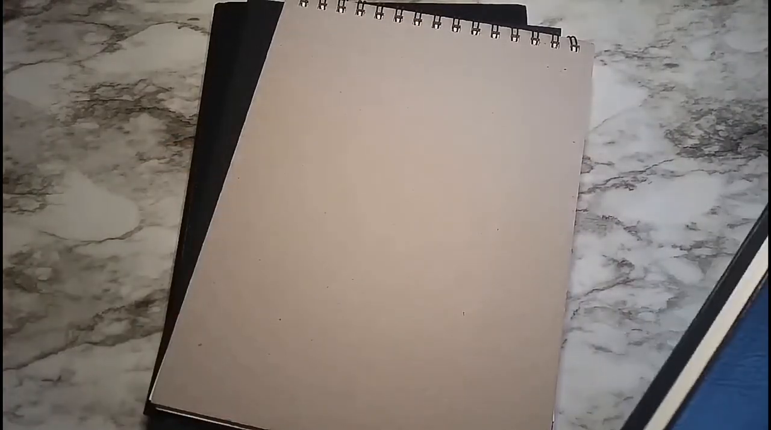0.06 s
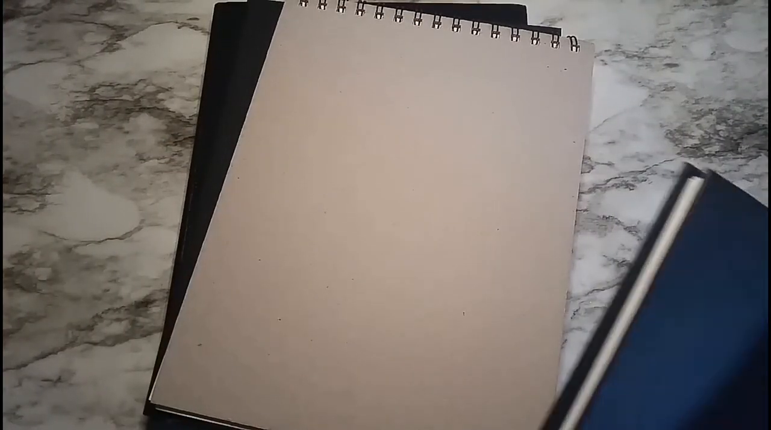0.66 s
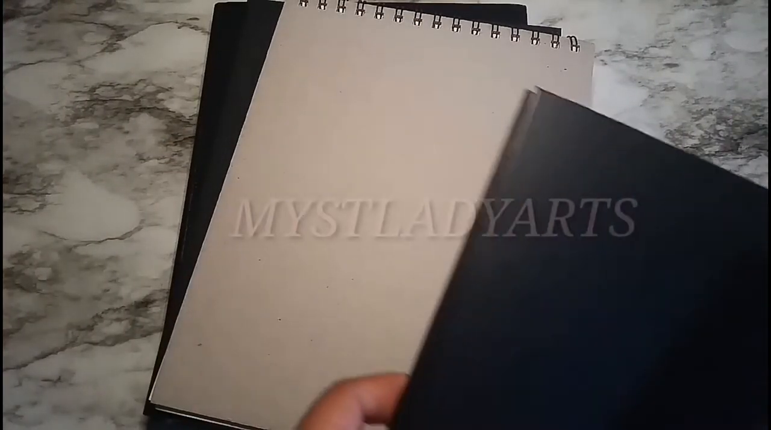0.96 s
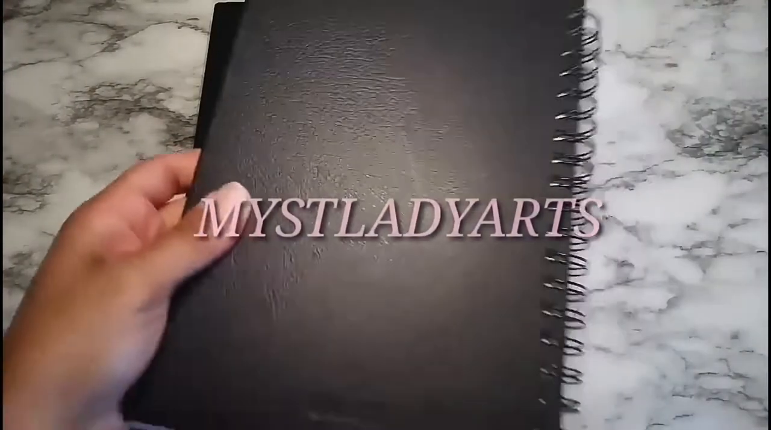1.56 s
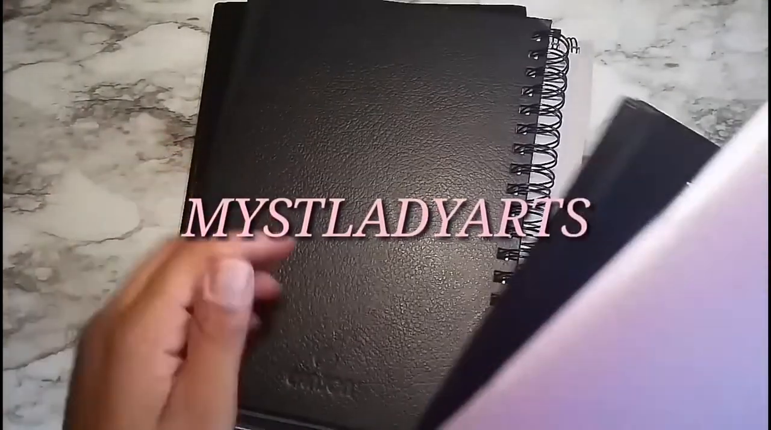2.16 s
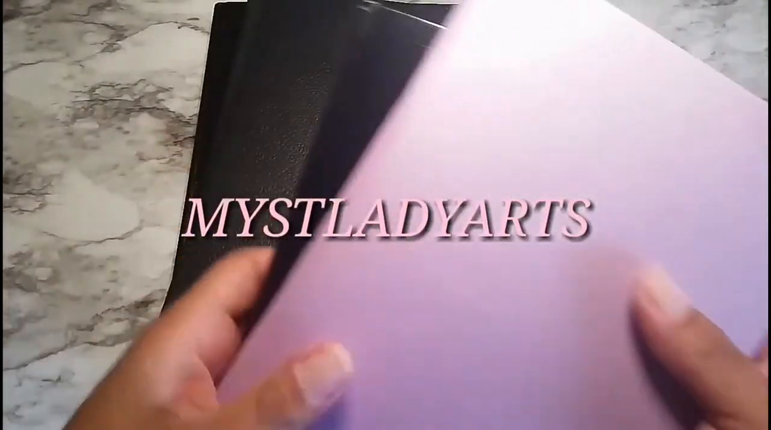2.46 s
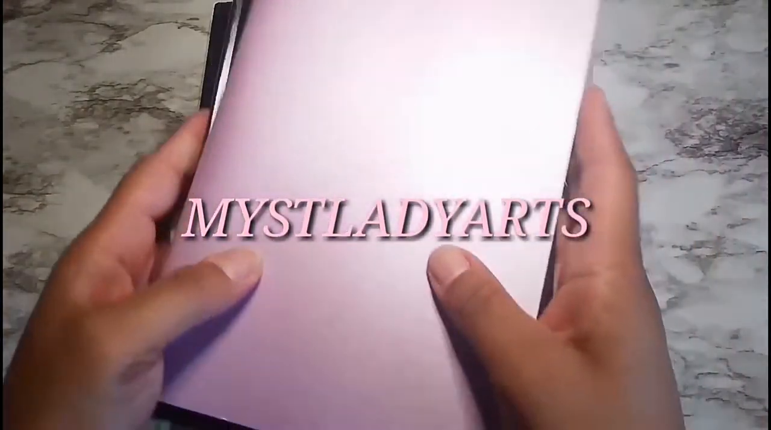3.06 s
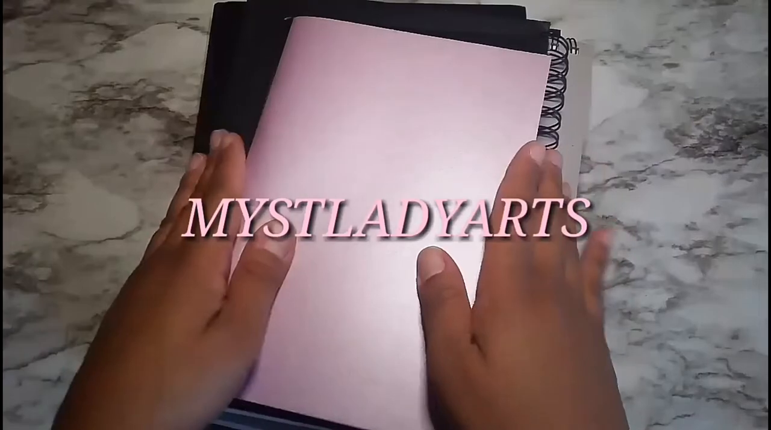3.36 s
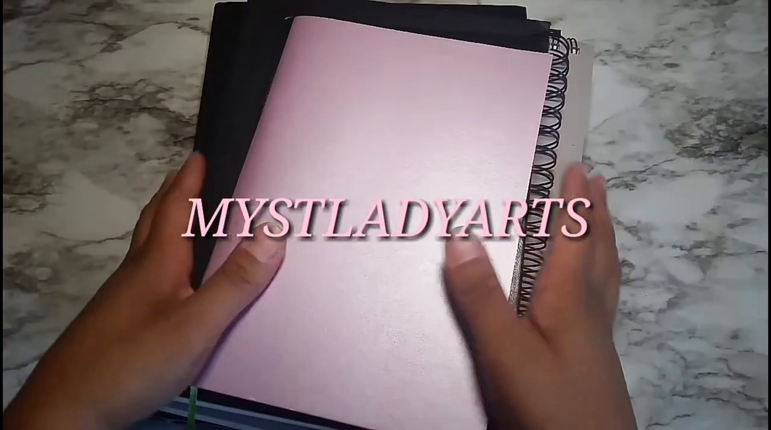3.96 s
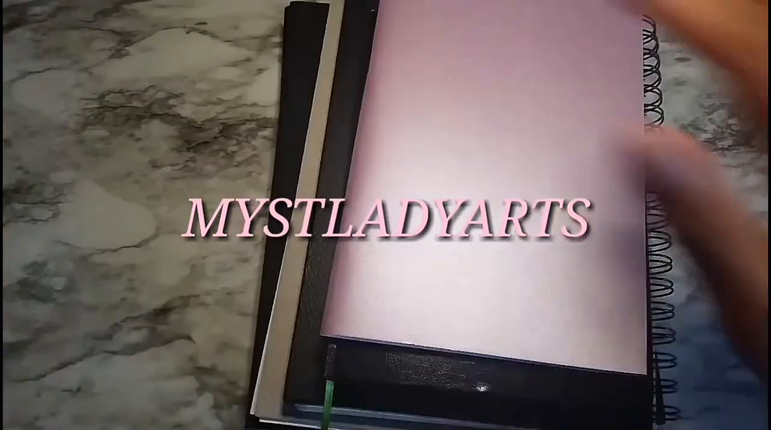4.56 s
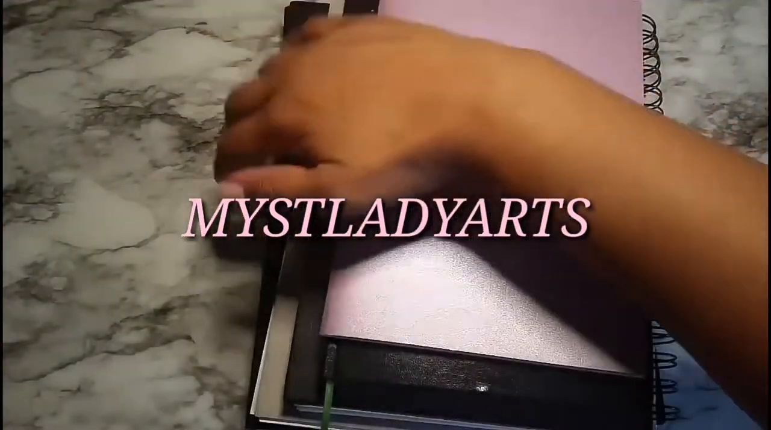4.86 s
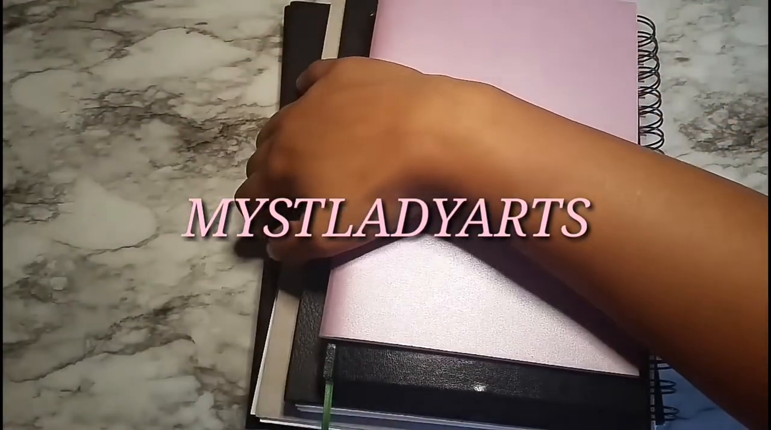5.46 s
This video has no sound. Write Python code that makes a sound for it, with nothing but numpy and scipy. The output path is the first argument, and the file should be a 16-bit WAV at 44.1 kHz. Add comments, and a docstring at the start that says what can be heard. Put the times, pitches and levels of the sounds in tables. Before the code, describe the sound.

Two hardcover sketchbooks are put down one after the other on a stack on a table, each with a sharp slap, a dull thud of pages and a brief wire rattle. Fingers knock and covers slide before each landing. After the heavier second one, everything goes quieter for a moment and an arm sweeps softly over the top. A low hum fills the small room, and the sound is clearer on the left.

```python
"""A small room hums; hands shuffle and tap, then two hardcover sketchbooks slap onto a pile on a table.
Each lands edge first, then flat: the cover slaps, the pages thud, the wire bindings rattle.
Between drops fingers tap and covers slide and scrape; at the end an arm brushes past.
The right microphone is muffled; gain control ducks for about a second after the heaviest drop."""
import sys
import numpy as np
from scipy import signal
from scipy.fft import rfft, irfft, next_fast_len
from scipy.io import wavfile
from scipy.ndimage import uniform_filter1d, minimum_filter1d, map_coordinates

SR = 44100
rng = np.random.default_rng(int(sys.argv[2]) if len(sys.argv) > 2 else 0)


def transcribe(u):
    """Save the signal u as a 16-bit wav file named by the first command-line argument.

    u: samples, shape (n,) or (channels, n), limited to [-1, 1]; the rate is SR.
    q: integer samples, one column per channel.
    """
    v = np.clip(np.atleast_2d(u).T, -1, 1)
    q = np.round(v * 32767).astype(np.int16)
    wavfile.write(sys.argv[1], SR, q)


N = 247823

# Table levels are relative; layers add their own offsets.
# left-right likeness of noise: freq_hz, correlation
STEREO_LIKENESS = [(60, 0.98), (130, 0.52), (290, 0.53), (640, 0.27), (1400, 0.008), (15000, 0.035)]
# muffled right microphone: freq_hz, gain_db
RIGHT_MIC_RESPONSE = [(60, -3.5), (170, -6), (400, -10), (720, -7), (1100, -20.5), (1600, -13), (3000, -14),
                      (5000, -10), (6500, 1), (8000, -3), (15000, -0.5)]
# reverb decay: freq_hz, t60_s
ROOM_DECAY = [(80, 0.41), (300, 0.58), (1000, 0.68), (4000, 0.49), (14000, 0.56)]
# reverb colour: freq_hz, density_db
ROOM_SPECTRUM = [(100, 5), (220, -12.5), (400, -2), (650, -6), (1000, -6), (4000, -1), (7000, -0.5),
                 (12000, 0.5)]
# room air: freq_hz, density_db
AIR_SPECTRUM = [(20, -15.5), (48, -6), (90, -2), (120, -3), (150, -10), (205, 1.5), (270, -7.5),
                (360, -7.5), (520, -16), (800, -18.5), (1500, -27.5), (3200, -40.5), (4200, -34),
                (5050, -28), (5700, -50), (6800, -47.5), (8500, -65), (12000, -46), (16000, -47)]
# background balance: freq_hz, left_minus_right_db
AIR_BALANCE = [(60, 3), (200, 6.5), (600, 9), (1300, 1), (2400, -3), (3300, -2.5), (5000, -11.5),
               (6500, -6), (9000, 2.5), (15000, 0)]
# appliance hum: pitch_hz, level_db
HUM_TONES = [(59.2, -57), (118.4, -52.5), (209.9, -55), (355.3, -58)]

# hands straightening the pile, then the passing arm: start_s, length_s, rumble_db, brush_db
HAND_AND_ARM_SWEEPS = [(3.8, 0.67, -49, -60), (4.36, 0.28, -44.5, -67), (4.655, 0.23, -38.5, -58.5),
                       (4.87, 0.36, -45, -59.5), (5.18, 0.29, -39.5, -50.5), (5.42, 0.44, -43, -52.5)]
# hands on the pile and passing arm: freq_hz, density_db
RUMBLE_SPECTRUM = [(20, -29), (45, 2.5), (80, -2), (180, 2.5), (260, -8), (350, -11.5), (700, -23.5),
                   (1500, -66)]
# skin brushing the cover: freq_hz, density_db
BRUSH_SPECTRUM = [(300, 9), (700, -6), (1500, -3.5), (3000, -14), (5000, -7.5), (7000, -32), (9000, -38),
                  (12000, -21), (16000, -23)]
# skin catching on the cover: start_s, length_s, level_db, centre_hz
SKIN_RUSTLES = [(4.689, 0.03, -62, 2480), (4.715, 0.089, -64, 1300), (5.139, 0.062, -58, 1350),
                (5.501, 0.035, -61.5, 2660), (5.558, 0.036, -58, 1290)]
# arm nudging the pile: start_s, level_db, pitch_hz
PILE_NUDGES = [(4.734, -22.5, 189), (4.755, -21, 90), (4.765, -24, 142), (4.835, -32, 273),
               (5.235, -24.5, 240), (5.365, -28, 237), (5.398, -25, 111), (5.529, -28, 152)]

# hand and cover movements: start_s, length_s, shuffle_db, slide_db
RUB_STROKES = [(0.08, 0.72, -48.5, -71), (0.74, 0.17, -52, -64.5), (0.99, 0.31, -44, -56.5),
               (1.3, 0.2, -54.5, -80), (2.54, 0.25, -70, -59), (2.685, 0.089, -47.5, -55.5),
               (2.765, 0.12, -42.5, -50), (2.87, 0.18, -50, -56), (3.005, 0.11, -45, -56),
               (3.08, 0.21, -46.5, -44.5), (3.26, 0.27, -56, -54), (3.85, 0.32, -60, -58),
               (5.49, 0.16, -56, -65.5)]
# hands on covers: freq_hz, density_db
SHUFFLE_SPECTRUM = [(200, -17), (500, 4.5), (800, 8.5), (1100, -5), (1500, -1.5), (2100, -7), (2900, -15),
                    (6000, -64), (16000, -68)]
# cover on cover: freq_hz, density_db
SLIDE_SPECTRUM = [(300, -17), (900, 5), (1600, 4.5), (2800, 0.5), (4600, 2.5), (5400, -7), (6500, -14.5),
                  (8500, -28), (11000, -16.5), (16000, -15)]
# cover edge on grained board: start_s, length_s, level_db, from_hz, to_hz
EDGE_SCRAPES = [(0.133, 0.35, -65, 2060, 1730), (0.286, 0.19, -72, 4700, 4570),
                (0.994, 0.13, -68, 4660, 4530), (2.688, 0.037, -57, 4130, 3400),
                (2.804, 0.049, -57, 4530, 3760), (3.008, 0.06, -53, 4640, 3550),
                (3.096, 0.18, -51, 4900, 2600)]
# flicks of one wire loop: start_s, level_db
LOOP_FLICKS = [(0.823, -48), (4.8981, -40.5)]
# wire loop ring: pitch_hz, level_db, t60_s
LOOP_MODES = [(2326, -11, 0.03), (2750, -12, 0.03), (3930, -8, 0.025), (4280, -1, 0.02), (4650, -1, 0.028)]
# fingers and corners bumping covers:
# start_s, tick_db, treble_db, click_db, click_hz, knock_db, knock_hz, knock_delay_s
COVER_TAPS = [(0.552, -43, -2, -35, 1640, -36.5, 610, 0.00086),
              (0.5561, -52, -2, -32, 1000, -41, 470, 0.00037), (0.823, -41, 1, -39, 1340, -52, 405, 0.0023),
              (.994, -49, -2, -37, 764, -37, 524, 0.0021), (1.099, -49, -2, -32.5, 870, -36, 402, 0.0023),
              (1.1454, -21.5, -20, -16.5, 806, -12.5, 280, 0.0018),
              (1.1954, -52, -2, -38, 1540, -31, 270, 0.00026),
              (2.564, -36.5, -2, -50, 1500, -63, 400, .002),
              (2.6515, -21.5, 7.5, -20.5, 935, -22.5, 286, 0.0058),
              (2.7056, -44, -2, -39, 1090, -48, 446, 0.002),
              (2.779, -54, -2, -30.5, 1160, -37, 370, 0.0023),
              (3.113, -27, -10, -46, 1700, -36, 370, 0.0013), (3.167, -19, 7, -15, 1120, -30, 840, 0.0029),
              (3.171, -29, 3, -23.5, 1700, -42, 920, 0.0019),
              (3.3345, -20.5, 2, -34, 890, -35.5, 624, 0.00063)]
# hollow ring of a firmly knocked book: start_s, level_db, pitch_hz, t60_s
HOLLOW_RINGS = [(1.15, -16, 383, 0.043), (1.165, -29.5, 298, 0.099), (1.8077, -13.5, 390, 0.061),
                (2.656, -16.5, 343, 0.054), (3.482, -15.5, 615, 0.062)]
# pile and tabletop: pitch_hz, level_db, t60_s
TABLETOP_MODES = [(79, -9, .5), (141, -5, .35), (168, -1, .3), (202, -4, .35), (224, -3, .35),
                  (277, -9, .3), (353, -6, .3), (381, -7, .3), (482, -3, .33), (547, -3, .33),
                  (608, -9.5, .32), (706, -3, .3), (760, 0, .35), (900, 2, .3), (1089, -2.5, .35),
                  (1195, -3, .3), (1320, 0, .35), (1510, -3, .2), (1588, -3, .3), (2110, -2, .25),
                  (2430, -4, .25), (2780, -7, .25)]

# two landings per book, edge then flat: time_s, treble_tilt_db, surround_db, tabletop_db, clack_db
BOOK_LANDINGS = [(1.804, -5, -4, -55.5, -11.5), (1.943, -3, -10.5, -55, -17), (3.436, -10, -19, -57, -20),
                 (3.472, -2.5, -0.5, -55.5, -27)]
# quick contacts within the landings: start_s, slap_db, slap_t60_s, thud_db, thud_hz
LANDING_CONTACTS = [(1.804, -18, 0.04, -31, 510), (1.8076, -9, 0.018, -28, 400),
                    (1.8111, -15.5, 0.014, -37, 376), (1.8159, -17, 0.049, -21.5, 450),
                    (1.942, -24, 0.03, -12.5, 307), (1.9458, -20, 0.041, -18.5, 583),
                    (1.9502, -35, 0.03, -16, 266), (1.9546, -22.5, 0.073, -18, 467),
                    (1.9628, -13, 0.043, -12.5, 410), (1.9675, -21, .04, -21, 857),
                    (1.9714, -20.5, 0.082, -14, 232), (3.435, -18.5, 0.028, -11.5, 280),
                    (3.4411, -19, 0.058, -9, 360), (3.4433, -20, 0.015, -17, 1110),
                    (3.4455, -35, .014, -18, 583), (3.4724, -10.5, 0.049, 0.5, 230),
                    (3.4789, -15, 0.044, -10, 576), (3.486, -22, .03, -17, 380),
                    (3.509, -31.5, 0.041, -14.5, 190), (3.522, -29, 0.033, -18, 180),
                    (3.538, -27, .03, -15, 316)]
# cover slap: freq_hz, density_db
SLAP_SPECTRUM = [(60, -3), (250, -4), (600, 8.5), (1100, 1), (1700, -2), (2600, -2), (3300, -7),
                 (4800, -7.5), (6300, -28.5), (8500, -44), (11000, -37), (16000, -37)]
# stiff cover's clack: pitch_hz, level_db, t60_s
COVER_MODES = [(1528, 4, 0.038), (2250, 0.5, 0.038), (2890, -10, 0.052), (3485, -2.5, 0.034),
               (4680, -15.5, 0.075)]
# jolts to the wire bindings: start_s, level_db, rise_s, t60_s
WIRE_JOLTS = [(1.804, -55.5, 0.001, .06), (1.9448, -40.5, 0.0003, 0.038), (1.963, -44.5, 0.0014, .08),
              (1.9665, -36, 0.00044, 0.023), (1.976, -44, .0004, 0.026), (3.168, -47, .0003, 0.037),
              (3.435, -52, .0005, .04), (3.441, -51, .001, 0.056), (3.4704, -30, .0003, 0.04),
              (3.478, -37.5, 0.0028, 0.24), (3.667, -50, 0.00036, 0.029)]
# binding rattle: freq_hz, level_db
WIRE_SPECTRUM = [(2000, -28.5), (5000, 6.5), (8000, -8), (11000, -5.5), (14000, -6), (16000, -14)]
# air squeezed from under a falling book: start_s, level_db, pitch_hz
AIR_PUFFS = [(1.964, -21.5, 59.6), (3.507, -16, 81.2)]


def amp(db):
    """Decibels to gain."""
    return 10 ** (np.asarray(db) / 20)


def unit_rms(x):
    """Scale to rms 1."""
    return x / np.sqrt(np.mean(x ** 2) + 1e-20)


def curve(points, hz):
    """Interpolate (freq_hz, value) points on a log frequency axis."""
    knots_hz, values = np.transpose(points)
    return np.interp(np.log(hz + 1), np.log(knots_hz + 1), values)


def wobble(rate_hz):
    """Smooth random curve, rate_hz knots per second."""
    knots = rng.standard_normal(int(N * rate_hz / SR) + 4)
    return map_coordinates(knots, [np.arange(N) * rate_hz / SR])


def filtered(x, response):
    """Zero-phase filter with gain response(hz)."""
    n = x.shape[-1]
    n_fft = next_fast_len(n + SR // 4)
    return irfft(rfft(x, n_fft) * response(np.fft.rfftfreq(n_fft, 1 / SR)), n_fft)[..., :n]


def noise(spectrum=None, size=N):
    """Stereo noise, rms 1, white by default: alike in the bass, unrelated in the treble."""
    def mid_side_gains(hz):
        angle = np.arccos(np.clip(curve(STEREO_LIKENESS, hz), -1, 1)) / 2
        gain = 1 if spectrum is None else amp(curve(spectrum, hz))
        return gain * np.array([np.cos(angle), np.sin(angle)])
    mid, side = filtered(rng.standard_normal((2, size)), mid_side_gains)
    return unit_rms(np.array([mid + side, mid - side]))


def add(track, start_s, sound):
    """Mix sound into track at start_s."""
    part = track[:, round(start_s * SR):][:, :sound.shape[-1]]
    part += sound[..., :part.shape[-1]]


def ring(t, hz, t60_s, attack_s):
    """Damped vibration with a soft start."""
    return np.sin(2 * np.pi * hz * t) * amp(-60 * t / t60_s) * (1 - np.exp(-t / attack_s))


def grains(times_s, hz, gain, t60_s):
    """One second of tiny damped pings, one per time, pitch and gain."""
    t = np.arange(SR // 50) / SR
    pings = gain[:, None] * ring(t, hz[:, None], t60_s, attack_s=0.00032)
    indices = (times_s * SR).astype(int)[:, None] + np.arange(len(t))
    return np.bincount(indices.ravel(), pings.ravel(), SR)[:SR]


def burst(t, spectrum, tilt, t60_s, snap):
    """Impact: an impulse plus decaying noise, coloured by a minimum-phase filter."""
    n_fft = 2 * next_fast_len(len(t))
    hz = np.fft.rfftfreq(n_fft, 1 / SR)
    cepstrum = irfft(np.log(amp(curve(spectrum, hz) + curve(tilt, hz))), n_fft)
    response = np.exp(rfft(np.r_[cepstrum[0], 2 * cepstrum[1:n_fft // 2]], n_fft))
    crack = noise(size=len(t)) * amp(-60 * t / t60_s)
    crack[:, 0] += snap * np.linalg.norm(crack[0])
    coloured = irfft(rfft(crack, n_fft) * response, n_fft)[:, :len(t)]
    return coloured / np.sqrt(np.mean(np.abs(response) ** 2))


def movements(rows, rise_share=0.2, fall_share=0.32):
    """One envelope per level column; each movement speeds up, holds, slows to rest."""
    envelopes = 0
    for start_s, length_s, *levels_db in rows:
        progress = (np.arange(N) / SR - start_s) / length_s
        ramp = np.clip(np.minimum(progress / rise_share, (1 - progress) / fall_share), 0, 1)
        envelopes += np.outer(amp(levels_db), np.sin(np.pi / 2 * ramp))
    return envelopes


def room(sound, build_up_s=0.013):
    """Diffuse wall reflections, drawn anew for each sound."""
    t = np.arange(sound.shape[-1]) / SR
    hz, frames_s, bands = signal.stft(noise(ROOM_SPECTRUM, len(t)), SR, nperseg=256)
    decay = amp(-60 * frames_s / curve(ROOM_DECAY, hz)[:, None])
    tail = signal.istft(bands * decay, SR, nperseg=256)[1][:, :len(t)]
    tail *= 1 - np.exp(-(t / build_up_s) ** 2)
    return signal.fftconvolve(sound, tail / np.linalg.norm(tail[0]), axes=1)[:, :len(t)]


def background():
    """Steady room air and appliance hum; more hiss on the right."""
    t = np.arange(N) / SR
    air = amp(-45) * noise(AIR_SPECTRUM)
    hum = sum(amp(db) * np.sqrt(2) * np.sin(2 * np.pi * hz * t + 1.04 * wobble(5.3))
              for hz, db in HUM_TONES)
    return filtered(air + hum, lambda hz: amp(curve(AIR_BALANCE, hz) * np.array([[0.5], [-0.5]])))


def hand_and_arm_sweeps():
    """Hands straighten the pile with a low rumble; then an arm passes with a soft, lumpy rumble and brushes the
    top cover."""
    rumble_gain, brush_gain = movements(HAND_AND_ARM_SWEEPS)
    lumps = unit_rms(amp(1.5 * wobble(50)))
    rumble = amp(7.5) * rumble_gain * noise(RUMBLE_SPECTRUM)
    brush = brush_gain * noise(BRUSH_SPECTRUM)
    return lumps * (rumble + brush)


def arm_touches(gap_scale_s=1 / 800, spread_oct=0.25):
    """Skin catches on the cover in tiny slips; the arm nudges the pile."""
    out, t = np.zeros((2, N)), np.arange(SR // 4) / SR
    for start_s, length_s, db, centre_hz in SKIN_RUSTLES:
        gap, pitch, size = rng.standard_normal((120, 3)).T
        times_s = np.cumsum(np.abs(gap)) * gap_scale_s
        progress = np.clip(times_s / length_s, 0, 1)
        gain = size * np.sqrt(progress * (1 - progress))
        slips = grains(times_s, centre_hz * 2 ** (spread_oct * pitch), gain, t60_s=0.006)
        add(out, start_s, amp(db) * np.sqrt(length_s) * unit_rms(slips))
    for start_s, db, hz in PILE_NUDGES:
        add(out, start_s, amp(db) * ring(t, hz, t60_s=0.11, attack_s=0.0057))
    return out


def rubbing():
    """Hands shuffle and covers slide under slightly uneven pressure."""
    shuffle_gain, slide_gain = movements(RUB_STROKES)
    pressure = unit_rms(amp(1.2 * wobble(300) + 0.8 * wobble(25)))
    hands = amp(-5.5) * shuffle_gain * noise(SHUFFLE_SPECTRUM)
    covers = amp(-2.0) * slide_gain * noise(SLIDE_SPECTRUM)
    return pressure * (hands + covers)


def scrapes(gap_scale_s=1 / 910, spread_oct=0.21, spread_db=2.5):
    """An edge catches on the board's grain in tiny slips that fall in pitch."""
    out = np.zeros((2, N))
    for start_s, length_s, db, from_hz, to_hz in EDGE_SCRAPES:
        gap, pitch, size = rng.standard_normal((400, 3)).T
        times_s = np.cumsum(np.abs(gap)) * gap_scale_s
        progress = np.clip(times_s / length_s, 0, 1)
        glide_hz = from_hz * (to_hz / from_hz) ** progress
        hz = glide_hz * 2 ** (spread_oct * np.minimum(pitch, 1))
        gain = amp(-spread_db * size) * np.sqrt(progress * (1 - progress))
        slips = grains(times_s, hz, gain, t60_s=0.0058)
        scrape = amp(db) * np.sqrt(length_s) * unit_rms(slips)[None]
        add(out, start_s, scrape + amp(-2.5) * room(scrape))
    return out


def wire_pings():
    """A flicked loop of the binding rings briefly."""
    out, t = np.zeros((2, N)), np.arange(SR // 4) / SR
    loop = sum(amp(db) * ring(t, hz, t60_s, attack_s=0.00039) for hz, db, t60_s in LOOP_MODES)
    for start_s, db in LOOP_FLICKS:
        add(out, start_s, amp(db) * loop)
    return out


def table_and_room(blow, tabletop_db):
    """A blow shakes the tabletop and fills the room."""
    t = np.arange(blow.shape[-1]) / SR
    modes = sum(amp(db + tabletop_db) * ring(t, hz, t60_s, attack_s=0.0033)
                for hz, db, t60_s in TABLETOP_MODES)
    return signal.fftconvolve(blow, modes[None], axes=1)[:, :len(t)] + room(blow)


def page_thud(t, hz, t60_s, delay_s):
    """The page block swings just after the cover; too small to radiate deep bass."""
    swing = ring(np.maximum(t - delay_s, 0), hz, t60_s, attack_s=0.00019)
    return signal.sosfilt(signal.butter(2, 0.63 * hz, "highpass", fs=SR, output="sos"), swing)


def taps():
    """The cover ticks and clicks, the book knocks as it gives; firm knocks ring hollow."""
    out, t = np.zeros((2, N)), np.arange(SR // 2) / SR
    for start_s, tick_db, treble_db, click_db, click_hz, knock_db, knock_hz, delay_s in COVER_TAPS:
        tilt = [(5000, 13), (9000, treble_db)]
        tick = amp(tick_db - 13) * burst(t, SLIDE_SPECTRUM, tilt, t60_s=0.018, snap=1.04)
        click = amp(click_db) * ring(t, click_hz, t60_s=0.011, attack_s=0.000068)
        knock = amp(knock_db + 8) * page_thud(t, knock_hz, t60_s=0.017, delay_s=delay_s)
        blow = tick + click + knock
        add(out, start_s, blow + amp(-14) * table_and_room(blow, tabletop_db=-45.5))
    for start_s, db, hz, t60_s in HOLLOW_RINGS:
        add(out, start_s, amp(db) * ring(t, hz, t60_s, attack_s=0.00068))
    return out


def wire_rattle(t, rise_s, t60_s, ticks_per_s=1900):
    """Jolted wire loops tick brightly in their holes, then settle."""
    channels = []
    for draws in rng.random((2, 2000, 3)):
        gap, pitch, size = draws.T
        times_s = np.cumsum(-np.log(1 - gap)) / ticks_per_s
        hz = 3000 + 12800 * pitch
        gain = amp(curve(WIRE_SPECTRUM, hz) - 5 * np.log(1 - 0.95 * size))
        channels.append(unit_rms(grains(times_s, hz, gain, t60_s=0.004)[:len(t)]))
    return np.array(channels) * (1 - np.exp(-t / rise_s)) * amp(-60 * t / t60_s)


def cover_clack(t, detune=0.033):
    """The stiff cover rings a little differently wherever it is struck."""
    return sum(amp(db) * ring(t, hz * np.exp(detune * rng.standard_normal()), t60_s, attack_s=0.0001)
               for hz, db, t60_s in COVER_MODES)


def book_drops():
    """Each contact slaps, clacks and thuds; bindings rattle; air puffs from under the book."""
    out, t = np.zeros((2, N)), np.arange(SR * 3 // 4) / SR
    for start_s, slap_db, t60_s, thud_db, thud_hz in LANDING_CONTACTS:
        nearest = min(BOOK_LANDINGS, key=lambda landing: abs(landing[0] - start_s))
        _, tilt_db, surround_db, tabletop_db, clack_db = nearest
        tilt = [(2000, 0), (8000, tilt_db)]  # flat landings are crisper
        slap = burst(t, SLAP_SPECTRUM, tilt, t60_s, snap=0.2)
        clack = amp(clack_db) * cover_clack(t)
        thud = page_thud(t, thud_hz, t60_s=0.023, delay_s=0.00038)
        blow = amp(slap_db) * (slap + clack) + amp(thud_db + 5.5) * thud
        add(out, start_s, blow + amp(surround_db + 3.5) * table_and_room(blow, tabletop_db))
    for start_s, db, rise_s, t60_s in WIRE_JOLTS:
        wires = amp(db) * wire_rattle(t, rise_s, t60_s)
        add(out, start_s, wires + amp(-4.5) * room(wires, build_up_s=0.012))
    for start_s, db, hz in AIR_PUFFS:
        add(out, start_s, amp(db) * ring(t, hz, t60_s=0.28, attack_s=0.0028))
    return out


def scene():
    """Books and hands over the background: clear left, muffled right."""
    left, right = (book_drops() + taps() + wire_pings() + rubbing() + scrapes()
                   + hand_and_arm_sweeps() + arm_touches())
    muffled = filtered(right, lambda hz: amp(curve(RIGHT_MIC_RESPONSE, hz)))
    return np.array([left, muffled]) + background()


def gain_control(x, threshold_db=-18, depth_db=10, hold_s=0.88, attack_s=0.32, release_s=0.47):
    """A loud stretch on the left turns both channels down; the gain holds, then recovers."""
    level_db = 10 * np.log10(np.abs(uniform_filter1d(x[0] ** 2, SR // 10)) + 1e-12)
    cut_db = depth_db * np.clip(level_db - threshold_db, 0, 1)
    window = int(hold_s * SR) | 1
    held_db = -minimum_filter1d(-cut_db, window, origin=window // 2, mode="constant")
    ramps_db = [signal.fftconvolve(held_db, np.ones(n) / n)[:N]
                for n in (int(attack_s * SR), int(release_s * SR))]
    return x * amp(-np.minimum(*ramps_db))


def record(dry, hiss_db=-91, top_hz=15800):
    """Microphone bass roll-off, gain control, clipping, faint hiss, band limit."""
    heard = signal.sosfilt(signal.butter(2, 32, "highpass", fs=SR, output="sos"), dry)
    clipped = np.clip(gain_control(heard), -1, 1)
    hiss = amp(hiss_db) * rng.standard_normal((2, N))
    return filtered(clipped + hiss, lambda hz: hz < top_hz)


dry = scene()
out = record(dry)
transcribe(out)
```